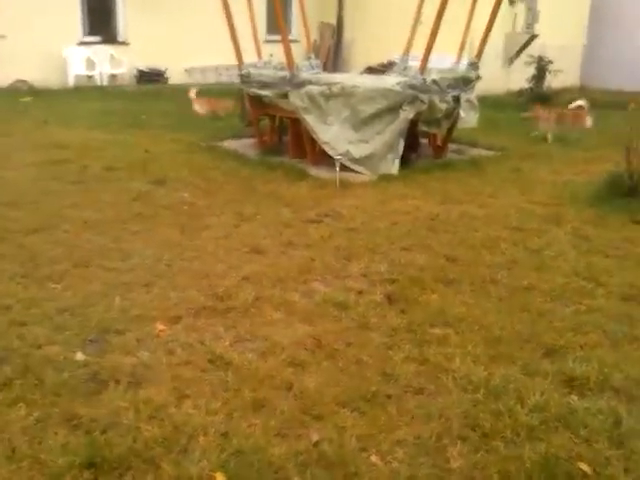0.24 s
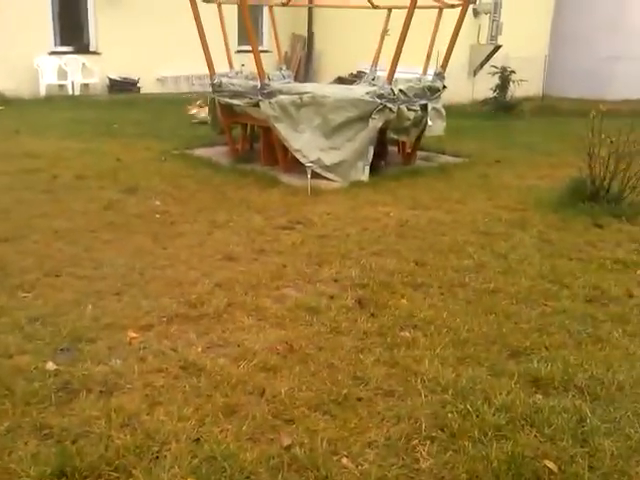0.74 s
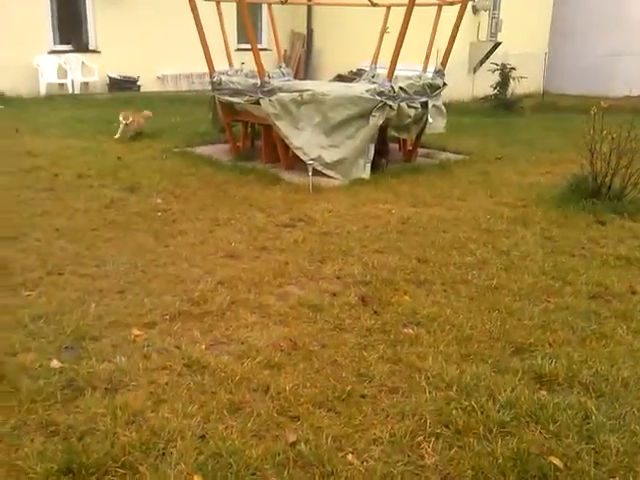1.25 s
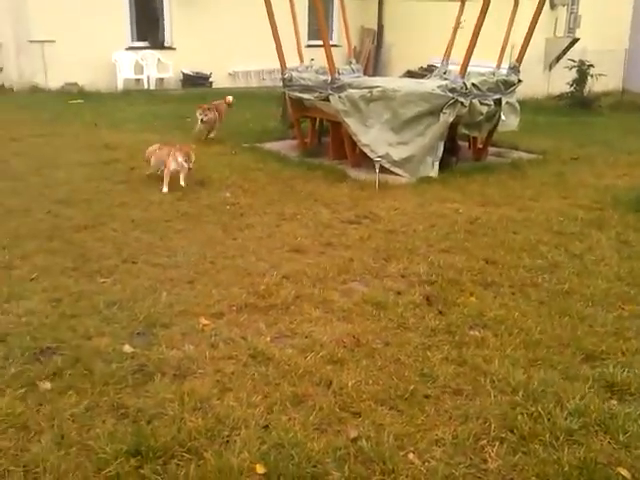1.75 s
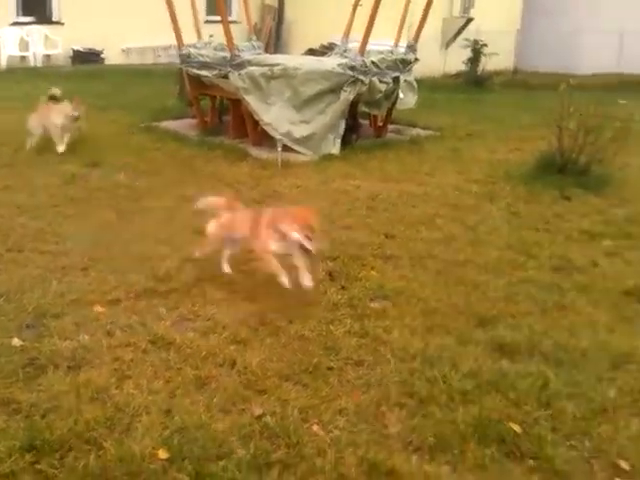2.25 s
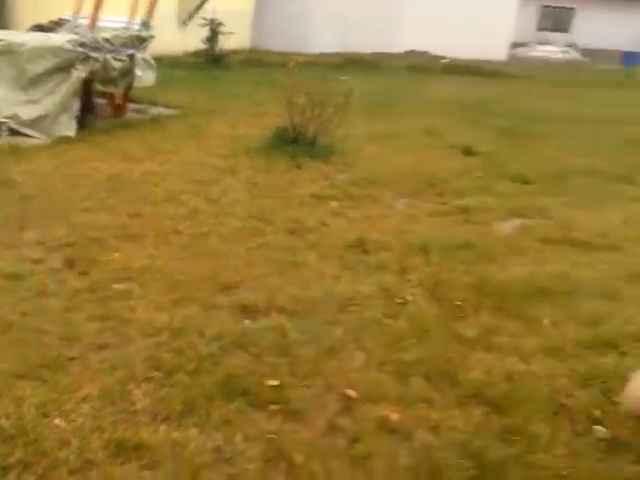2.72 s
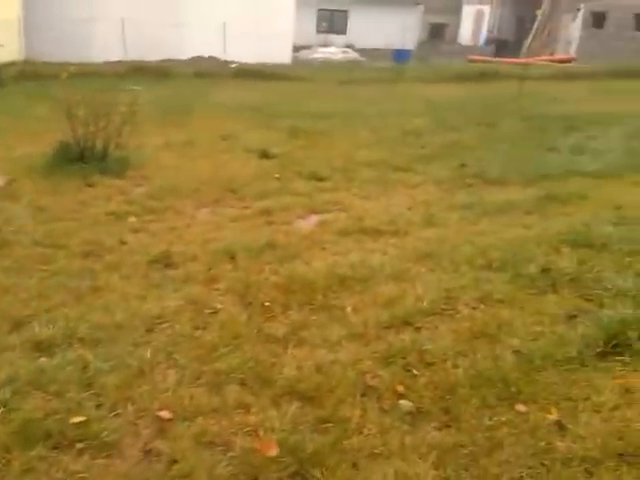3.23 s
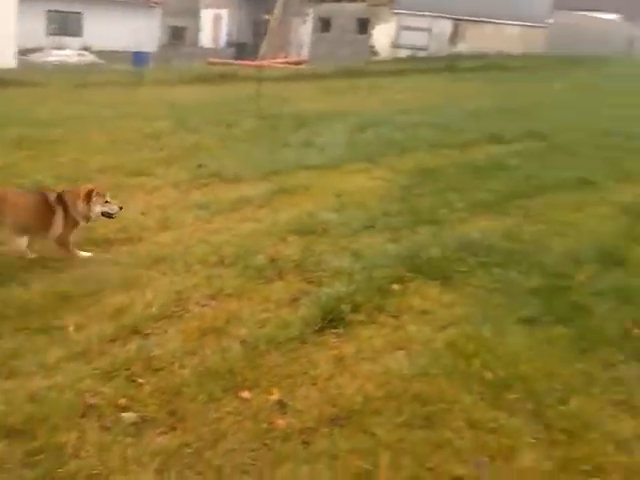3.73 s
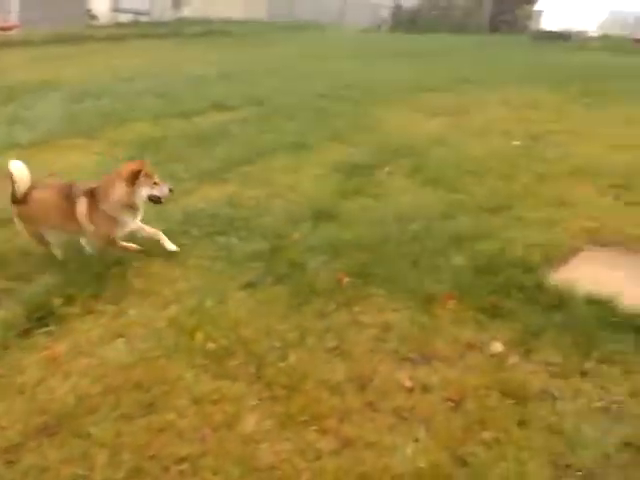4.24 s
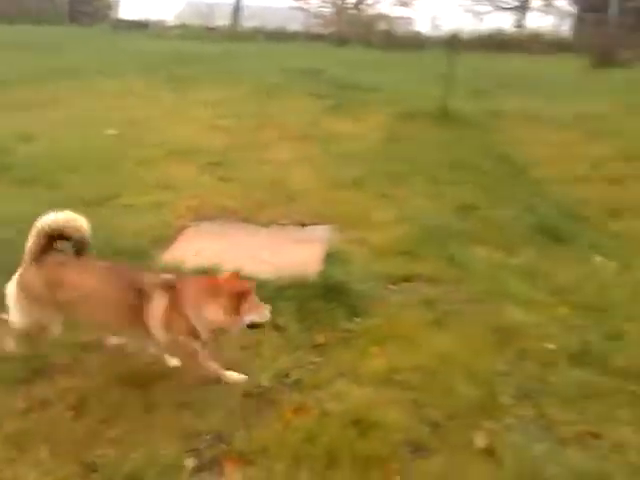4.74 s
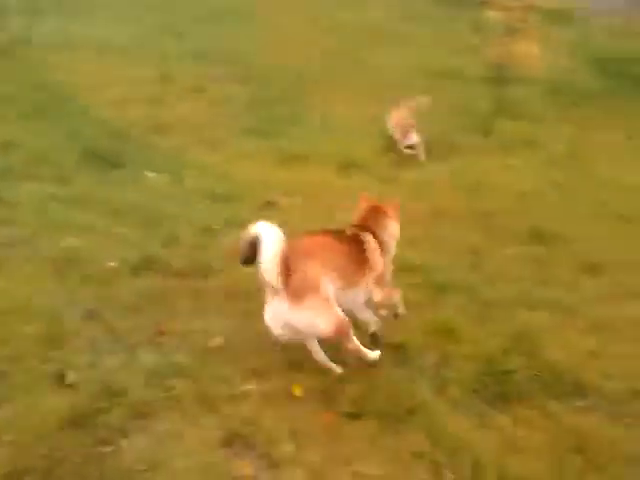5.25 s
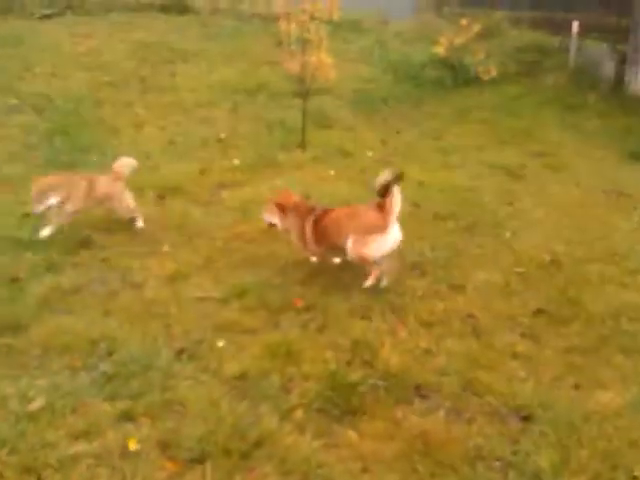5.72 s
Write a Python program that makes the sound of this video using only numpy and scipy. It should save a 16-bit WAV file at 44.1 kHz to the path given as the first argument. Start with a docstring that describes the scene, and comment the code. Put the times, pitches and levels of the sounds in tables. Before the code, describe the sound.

Two dogs run over a garden lawn on a still day. At first the grass rustles faintly, with a few sharp snaps of dry stalks. One dog then passes close, its paws thudding and scuffing the turf, and a few hard knocks sound nearby. The rustling, snapping and patter grow busier as it circles the microphone, panting in faint short puffs over a low outdoor rumble and hiss.

```python
"""Two dogs gallop over a lawn on a still day; one passes close by and circles the listener.
Their nearness sets how loud and bright the grass stirs and how strong the light steps and small snaps are.
On top, single strides sweep the grass, paws thud and scuff the turf, dry stalks snap, the near dog
pants as it bounds, and a few hard knocks sound close by.
Underneath lies a bed of faint outdoor rumble and the hiss of a small microphone."""
import sys
import numpy as np
from scipy import signal
from scipy.fft import rfft, irfft
from scipy.io import wavfile
from scipy.ndimage import uniform_filter1d, map_coordinates

SR = 44100
rng = np.random.default_rng(int(sys.argv[2]) if len(sys.argv) > 2 else 0)


def to_wav(s):
    """Save 16-bit WAV."""
    ch = np.atleast_2d(s).T  # columns
    pcm = np.round(np.clip(ch, -1, 1) * 32767)  # PCM
    wavfile.write(sys.argv[1], SR, pcm.astype(np.int16))


N = 263718
TIME = np.arange(N) / SR


def amp(db):
    """Decibels to gain."""
    return 10 ** (np.asarray(db) / 20)


def unit(x):
    """Scales to rms 1."""
    return x / np.sqrt(np.mean(x ** 2) + 1e-20)


def add(mix, start_s, sound):
    """Lays a sound into the mix at start_s."""
    part = mix[max(round(start_s * SR), 0):][:len(sound)]
    part += sound[:len(part)]


def colour(x, curve):
    """Equalises by a curve of (freq_hz, gain_db) points."""
    hz, db = np.transpose(curve)
    bins_hz = np.fft.rfftfreq(len(x), 1 / SR)
    gain_db = np.interp(np.log(bins_hz + 1), np.log(hz + 1), db)
    return irfft(rfft(x) * amp(gain_db), len(x))


def lowpass(x, hz):
    """The part of a sound below hz, with no phase shift."""
    return signal.sosfiltfilt(signal.butter(6, hz, fs=SR, output="sos"), x)


def band_noise(count, hz, width_hz):
    """Noise through a steep resonance, rms 1."""
    pass_width_hz = width_hz * np.pi / 2  # two passes narrow it back to width_hz
    peak = signal.iirpeak(min(hz, SR / 2 - 1), hz / pass_width_hz, fs=SR)
    once = signal.lfilter(*peak, rng.standard_normal(count))
    return unit(signal.lfilter(*peak, once))


def swell(t, centre_s, length_s, squareness=2.04):
    """A bell of power, length_s wide at half height."""
    return .5 ** np.minimum(abs(2 * (t - centre_s) / length_s) ** squareness, 100)


def crackle(per_s, spread_db):
    """A random train of tiny breaks, most small and a few large."""
    size = amp(spread_db * np.minimum(rng.exponential(1, N), 4))
    return unit(size * rng.choice([-1, 1], N) * (rng.random(N) < per_s / SR))


def flutter(x, depth_db):
    """Different blades sound from moment to moment: patches some 20 ms long and 500 Hz wide."""
    spectrum = signal.stft(x, nperseg=256)[2]
    bands = uniform_filter1d(rng.standard_normal(spectrum.shape), size=3, axis=0)
    patches = unit(uniform_filter1d(bands, size=8, axis=1))
    return unit(signal.istft(spectrum * amp(depth_db * patches), nperseg=256)[1][:N])


# The dogs' nearness as a fader on the stirred grass, a first pass then a closer circle: time_s, level_db
NEARNESS_FADER = [(0, -68), (.55, -95), (.85, -74.5), (1.5, -65), (2.38, -68.5), (2.55, -56), (2.85, -60.5),
                  (3.05, -59.5), (3.22, -64.5), (4.5, -64.5), (4.78, -63.5), (5.1, -62), (5.98, -59)]


def nearness_db(s):
    """Level of the stirred grass at s seconds."""
    return np.interp(s, *np.transpose(NEARNESS_FADER))


def tufts(x, gap_s=.025, pitch_share=.035):
    """Each tuft of grass sounds a little higher or lower than the last."""
    tuft_times = np.arange(0, N / SR + 1, gap_s)
    detune = np.interp(TIME, tuft_times, np.diff(rng.standard_normal(len(tuft_times) + 1)))
    playhead = np.cumsum(1 + pitch_share * unit(detune))
    return map_coordinates(x, [playhead], order=3, mode="mirror")


# Close crackle as coloured by the microphone's 5 kHz resonance: freq_hz, gain_db
CLOSE_MIC_EQ = [(300, -31), (2800, -19), (3800, -13), (4450, -10), (4950, 0), (5350, 0.2), (6000, -12),
                (7200, -3), (8500, -8.5), (10000, -15.5), (12000, -24), (16000, -47)]
# The crackle as heard from across the lawn: freq_hz, gain_db
FAR_GRASS_EQ = [(300, -12.5), (2500, -6.5), (3800, -10), (5200, 2), (6000, -8.5), (7000, 0), (8300, -9.5),
                (10000, -19.5), (12000, -32), (16000, -41)]


def blades(breaks, far_db=-65, crossfade_db=1):
    """Grass crackle, broad and papery from afar; close up, sharpened by the microphone's resonance."""
    near = np.clip((nearness_db(TIME) - far_db) / crossfade_db, 0, 1)
    close_tone = unit(colour(breaks, CLOSE_MIC_EQ))
    far_tone = unit(colour(breaks, FAR_GRASS_EQ))
    return tufts(near * close_tone + (1 - near) * far_tone)


def clumps(depth_db=2, rate_hz=86):
    """A quick, uneven gain of rms 1: blades give way in clumps."""
    wobble = unit(lowpass(rng.standard_normal(N), rate_hz))
    return unit(amp(depth_db * np.clip(wobble, -2, 2)))


# Legs sweeping through the grass: centre_s, length_s, level_db, crisp_over_body_db, soil_over_sweep_db
LEG_SWEEPS = [(0.748, 0.083, -65.5, 5, -1), (1.173, 0.1, -75, 9, -14), (1.423, 0.042, -61.5, -1, 1.5),
              (1.533, 0.0099, -53.5, 7, -25), (1.602, 0.015, -59, 7, 1), (1.633, 0.029, -51.5, 7, -16),
              (1.877, 0.048, -56.5, 0, -9), (2.144, 0.036, -52, -3.5, -8), (2.23, 0.025, -64.5, -8, -1),
              (2.457, .012, -54.5, 4, -11), (2.484, 0.019, -51.5, 6, -9), (2.633, 0.064, -50, 0, -6.5),
              (2.745, 0.029, -58.5, 7, -14), (3.005, 0.043, -58, 5, -21), (3.11, 0.067, -56.5, -5, -17),
              (3.297, 0.0084, -54, 4, -11), (3.378, 0.062, -55.5, -2, -7.5), (3.49, .025, -58, 5, -5),
              (4.012, 0.09, -60.5, -1, -3.5), (4.27, 0.063, -57.5, -1, -23), (4.348, 0.013, -54, -11, -12),
              (4.388, 0.037, -56.5, -2, -13), (4.508, 0.029, -56, -4, -4.5), (4.598, 0.062, -55, -1.5, -11),
              (4.674, 0.028, -53, 2, -5), (4.854, 0.023, -53, -2, -5), (4.912, 0.051, -47.5, -6.5, -12),
              (5.076, 0.039, -47, -1.5, -9), (5.142, 0.092, -50.5, -4, -14), (5.212, 0.034, -54, -4, -20),
              (5.294, 0.032, -45.5, 2.5, -20), (5.345, 0.0093, -48.5, 6, -9), (5.449, 0.07, -48.5, -1, -6),
              (5.53, 0.02, -53.5, 5, -17), (5.597, 0.051, -50.5, 2, -20), (5.662, .025, -53.5, -12, -3.5),
              (5.718, 0.051, -50.5, -5, -15), (5.824, 0.075, -56, -5, -2.5),
              (5.887, .011, -47.5, -10.5, -21), (5.904, 0.027, -48.5, -5, -22)]


def grass(split_hz=5870):
    """Loose blades crackle throughout; each sweep adds a dense rustle, split into body and crisp top."""
    body_power, crisp_power = np.zeros((2, N))
    for centre_s, length_s, db, crisp_db, _ in LEG_SWEEPS:
        stroke = swell(TIME, centre_s, length_s)
        body_power += amp(db - crisp_db / 2) ** 2 * stroke
        crisp_power += amp(db + crisp_db / 2) ** 2 * stroke
    stirred = amp(nearness_db(TIME)) * flutter(blades(crackle(per_s=1200, spread_db=1.5)), depth_db=4)
    swept = flutter(blades(crackle(per_s=14000, spread_db=2.5)), depth_db=2)
    body = lowpass(swept, split_hz)
    crisp = swept - body
    return clumps() * (stirred + np.sqrt(body_power) * body + np.sqrt(crisp_power) * crisp)


def light_steps(stride_s=.3, paw_gap_s=.055, jitter_s=.0147, pitch_hz=183, decay_cycles=5.1):
    """Thud cues for the gallop: four paws land in turn, then the dog flies; louder when near."""
    times = [stride + paw * paw_gap_s for stride in np.arange(0, N / SR, stride_s) for paw in range(4)]
    cues = []
    for s, (late, force, pitch) in zip(times, rng.standard_normal((len(times), 3))):
        db = nearness_db(s) + 3 + 3 * force  # 3 dB over the grass, give or take 3
        hz = pitch_hz * 2 ** (.57 * pitch)  # spread in octaves
        cues.append((s + jitter_s * late, db, hz, decay_cycles))
    return cues


# Heavy landings on the turf: start_s, level_db, pitch_hz, decay_cycles (to fall 60 dB)
LANDINGS = [(2.26, -49.5, 197, 3), (2.452, -46, 290, 7), (2.464, -47, 110, 2.5), (2.4845, -39, 201, 3),
            (2.493, -48.5, 105, 7.5), (2.609, -38, 235, 2.5), (2.7852, -45.5, 188, 6.5),
            (3.092, -47, 367, 6), (3.4444, -41, 340, 5.5), (3.569, -42, 65.7, 2.5), (3.809, -41.5, 88, 1),
            (4.635, -49, 236, 10), (4.858, -44, 171, 3), (4.981, -42.5, 187, 3.5), (5.074, -44, 226, 8.5),
            (5.108, -44.5, 170, 2.5), (5.155, -48.5, 177, 8), (5.417, -43, 290, 1), (5.451, -46, 322, 16),
            (5.4646, -43, 297, 29), (5.642, -44.5, 260, 2.5), (5.712, -45, 332, 8), (5.829, -47, 220, 4),
            (5.865, -51, 310, 11), (5.968, -47, 342, 15)]


def thuds(rise_s=.00053, sag_share=.19, sag_s=.003):
    """The turf gives way under each paw with a damped low push that sinks in pitch."""
    out, t = np.zeros(N), np.arange(SR // 10) / SR
    for start_s, db, hz, decay_cycles in list(LANDINGS) + light_steps():
        envelope = (1 - np.exp(-t / rise_s)) * amp(-60 * t * hz / decay_cycles)
        turns = np.cumsum(hz * (1 + sag_share * np.exp(-t / sag_s))) / SR
        push = .9 * np.sin(2 * np.pi * turns) + .15 * band_noise(len(t), hz, width_hz=hz)
        add(out, start_s, amp(db) * envelope / envelope.max() * push)
    return out


# Tone of scuffed soil: freq_hz, gain_db
SOIL_EQ = [(60, 2), (130, -2), (300, 6.5), (480, -1.5), (700, 1), (1000, -6), (1450, -1), (2000, -4),
           (2600, -3), (3350, -6.5), (4000, -9), (5000, -4), (8000, -9), (16000, -64)]


def soil(stir_db=-3, crumble_db=-22.5, crumble_s=.081):
    """A dull, grainy scuff that follows the level of the stirred grass, the sweeps and the landings."""
    power = amp(nearness_db(TIME) + stir_db) ** 2
    for centre_s, length_s, db, _, soil_db in LEG_SWEEPS:
        power += amp(db + soil_db) ** 2 * swell(TIME, centre_s, length_s)
    for s, db, hz, _ in LANDINGS:
        firmness_db = np.log2(hz / 255)  # firm, higher-pitched turf scuffs more: 1 dB per octave
        power += amp(db + crumble_db + firmness_db) ** 2 * swell(TIME, s, crumble_s)
    grit = colour(crackle(per_s=5000, spread_db=2.5), SOIL_EQ)
    return np.sqrt(power) * flutter(grit, depth_db=4)


# Tone of the background bed: freq_hz, gain_db
AIR_EQ = [(15, -26), (30, -6.5), (50, 2), (65, -9), (100, -6), (180, -10), (300, -10.5), (500, -15),
          (1000, -17.5), (2000, -20), (7000, -21), (12000, -23), (15800, -22.5)]


def air(bed_db=-62, rumble_db=-74):
    """Steady microphone hiss over a distant rumble."""
    bed = unit(colour(rng.standard_normal(N), AIR_EQ))
    return amp(bed_db) * bed + amp(rumble_db) * band_noise(N, hz=58, width_hz=25)


def small_snaps(per_s=8.4, over_grass_db=11.5, ring_hz=5550, edge_db=2, tick_gap_s=.0075):
    """Snap cues at random moments, louder when the dogs are near: rattles of three ticks, 1 dB apart."""
    times = np.flatnonzero(rng.random(N) < per_s / SR) / SR
    cues = []
    for s, (force, pitch) in zip(times, rng.standard_normal((len(times), 2))):
        db = nearness_db(s) + over_grass_db + 3 * force
        hz = ring_hz * 2 ** (.46 * pitch)  # spread in octaves
        cues += [(s + tick * tick_gap_s, db - tick, hz, edge_db) for tick in range(3)]
    return cues


# Tone of a snap's sharp edge: freq_hz, gain_db
EDGE_EQ = [(300, -32), (2500, -14), (3600, -14), (4600, -1.5), (7500, -1), (9500, -6), (11500, -23),
           (16000, -45)]
# The loudest dry stalks and leaves snapping: start_s, peak_db, ring_hz, edge_over_ring_db
STALK_SNAPS = [(.3383, -29.5, 4330, -4.5), (.3475, -36.5, 4900, -7), (.3580, -44, 4950, -6),
               (1.371, -43.5, 4600, -1), (1.5348, -38, 6300, -6), (1.6975, -42, 5200, -3),
               (1.6985, -47, 6950, -8), (1.8467, -38.5, 7100, -1), (1.9176, -29.5, 4950, -10),
               (1.9217, -40, 4500, -8), (2.4737, -37, 5300, 0), (2.481, -36, 5500, 2),
               (2.5882, -34, 5000, -1), (2.6095, -37, 5200, 2), (2.6897, -40, 4380, -6),
               (2.7317, -43, 8700, -1), (2.8005, -42.5, 4950, 1), (2.9025, -28, 5150, -7),
               (2.9044, -28, 5200, -13.5), (3.0015, -39, 4700, 0), (3.1012, -44, 5700, -6),
               (3.1116, -34, 4650, -2), (3.4999, -40.5, 7800, 0), (3.6438, -42, 4840, -5),
               (3.6455, -38.5, 4900, -8), (3.6768, -32, 5400, -3), (3.7635, -36, 5400, -2),
               (3.769, -43, 5100, -6), (3.9292, -38.5, 5400, 7), (3.943, -44, 4900, -6),
               (4.0058, -38, 6940, -1), (4.013, -43, 6540, 0), (4.0243, -47, 5400, 2),
               (4.1419, -41, 5100, 1), (4.2223, -45, 3900, 2), (4.2245, -45, 7600, -8),
               (4.3048, -35.5, 4930, -6), (4.338, -38, 4800, -8), (4.3635, -40.5, 4800, -7),
               (4.6565, -35, 6110, 4), (4.6662, -38, 5220, -11), (4.6682, -35, 5600, 2),
               (4.6875, -36.5, 6160, 8), (4.7302, -34, 7600, 1), (4.7330, -30, 6340, 1),
               (4.7918, -42, 5730, 0), (4.9172, -33, 4970, -17), (4.9192, -34, 5100, -16),
               (4.93, -34, 5560, 5), (4.9498, -33.5, 7600, 2), (4.9525, -39, 5400, -4),
               (4.9768, -31, 5040, -5), (4.9782, -30.5, 5140, -7), (5.0135, -41, 7800, 4),
               (5.0725, -32, 6000, 3), (5.1274, -39, 5200, 2), (5.1492, -39, 5100, -3),
               (5.1775, -32, 4680, -8), (5.1783, -31.5, 6900, -5), (5.195, -38, 5830, -20),
               (5.2215, -40, 7110, -3), (5.261, -34.5, 8850, -1), (5.3425, -33, 5500, -10),
               (5.3845, -35.5, 5000, 0), (5.4635, -37, 5300, 1), (5.5423, -37, 5430, -6),
               (5.574, -37, 5200, -5), (5.581, -34.5, 5200, -6), (5.623, -43, 7200, -5),
               (5.6752, -38.5, 5160, -4), (5.6888, -36, 5040, -11), (5.7119, -36, 4900, -7),
               (5.72, -32.5, 5100, -17), (5.74, -37, 5500, -5), (5.8661, -40, 5280, -3),
               (5.8783, -33.5, 5010, -3), (5.9734, -36.5, 5300, -10)]


def snaps(rise_s=.00042, edge_s=.0008, fibres_s=.005, fibres_db=-16, clean_edge_db=-10):
    """A stalk breaks with a sharp edge and a brief ring, too thin to sound low; torn fibres fizz on."""
    out, t = np.zeros(N), np.arange(SR // 50) / SR
    low_cut = signal.butter(6, 3860, "highpass", fs=SR, output="sos")
    tear_envelope = np.exp(-t / edge_s) + amp(fibres_db) * np.exp(-t / fibres_s)
    for start_s, db, hz, edge_db in list(STALK_SNAPS) + small_snaps():
        # a clean break has a weak edge and rings longer: twice as long for each 6.5 dB
        peak_s = rise_s * 2 ** (max(clean_edge_db - edge_db, 0) / 6.5)
        ring_envelope = (t / peak_s * np.exp(-t / peak_s)) ** 2
        ring = signal.sosfilt(low_cut, np.sin(2 * np.pi * hz * t) * ring_envelope)
        tear = rng.standard_normal(len(t)) * tear_envelope
        edge = colour(np.roll(tear, round(rise_s * SR)), EDGE_EQ)
        snap = ring / abs(ring).max() + amp(edge_db) * edge / abs(edge).max()
        add(out, start_s + .0005, amp(db) * snap / abs(snap).max())
    return out


# The near dog's breaths, each with its own mouth shape:
# centre_s, length_s, level_db, formant1_hz, formant2_hz, formant3_hz, formant_step_db
BREATHS = [(1.886, 0.034, -58, 2080, 2540, 4670, 5), (2.155, 0.027, -53.5, 1350, 3600, 5150, 3),
           (2.652, 0.048, -54, 1710, 2080, 3000, -3), (3.082, 0.022, -61, 1610, 2720, 3540, -20),
           (3.161, 0.023, -64, 1560, 2750, 3500, -3), (4.139, 0.025, -63.5, 1330, 1800, 3420, -7),
           (4.29, 0.016, -59, 1480, 1720, 3470, -3), (4.593, 0.029, -55.5, 1480, 2740, 3300, -4.5),
           (4.907, 0.036, -52.5, 1980, 2500, 2600, 3), (5.088, 0.029, -51.5, 2830, 3230, 4540, 5),
           (5.462, 0.036, -53, 1330, 2350, 2700, -4), (5.72, .05, -56.5, 3400, 3730, 5000, 1.5),
           (5.907, 0.02, -50, 1200, 1630, 2820, -0.5)]


def panting(formant_width_hz=196):
    """Short puffs of air resonate in the dog's throat and open mouth."""
    out, t = np.zeros(N), np.arange(-SR // 10, SR // 10) / SR
    for centre_s, length_s, db, *formants_hz, step_db in BREATHS:
        puff = sum(amp(k * step_db) * band_noise(len(t), hz, formant_width_hz)
                   for k, hz in enumerate(formants_hz))
        add(out, centre_s + t[0], amp(db) * unit(puff) * np.sqrt(swell(t, 0, length_s)))
    return out


# The modes that ring in a knock: pitch_hz, level_db, t60_s
TAP_MODES = [(380, -3, 0.012), (563, -1, .008), (1480, -1.5, 0.01), (2250, 2.5, 0.0055), (3130, 2, 0.0072),
             (4200, 7, 0.0048), (5340, 3.5, 0.0042), (7330, 0.5, .003)]
# Hard knocks close by: start_s, peak_db, body_boost_db, tilt_db_per_octave
CLOSE_KNOCKS = [(3.091, -27, -9, -2.5), (3.1218, -39, 7, 3), (3.3877, -34.5, 2, 7), (3.4435, -31.5, 2, 1),
                (3.451, -41.5, 4, 3), (3.9095, -50, -6, -10), (4.8108, -47, 8, -1)]


def knocks(body_below_hz=1000, tilt_pivot_hz=3000):
    """A hard tap rings heavily damped modes; a blunt one has more body, a glancing one more treble."""
    out, t = np.zeros(N), np.arange(SR // 20) / SR
    for start_s, db, body_db, tilt in CLOSE_KNOCKS:
        tap = np.zeros(len(t))
        for k, (hz, mode_db, t60_s) in enumerate(TAP_MODES):
            blow_db = body_db if hz < body_below_hz else tilt * np.log2(hz / tilt_pivot_hz)
            tap += (-1) ** k * amp(mode_db + blow_db - 60 * t / t60_s) * np.sin(2 * np.pi * hz * t)
        add(out, start_s, amp(db) * tap / abs(tap).max())
    return out


def scene():
    """Open lawn in mono: every sound arrives dry."""
    return (grass() + soil() + panting() + snaps() + knocks() + thuds() + air())[None]


def record(dry):
    """A steep high cut at 15.9 kHz and a small constant offset."""
    high_cut = signal.firwin(511, 15900, window=("kaiser", 9), fs=SR)
    return signal.oaconvolve(dry, high_cut[None], "same") - .0033


dry = scene()
out = record(dry)
to_wav(out)
```